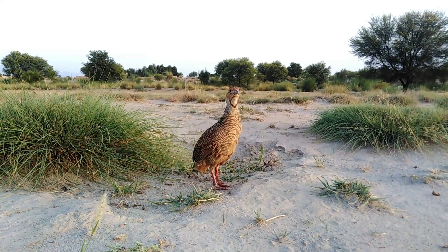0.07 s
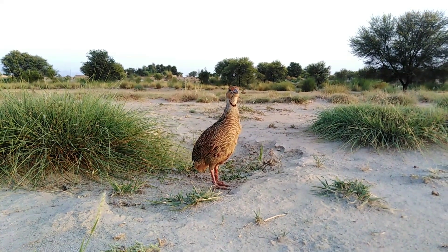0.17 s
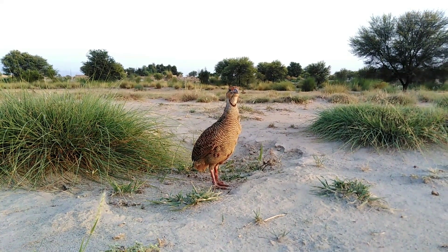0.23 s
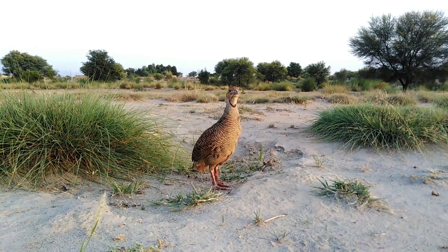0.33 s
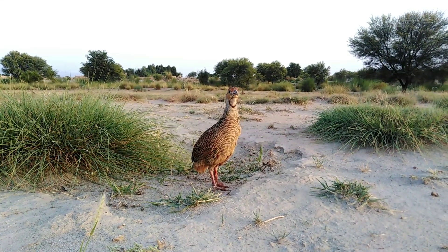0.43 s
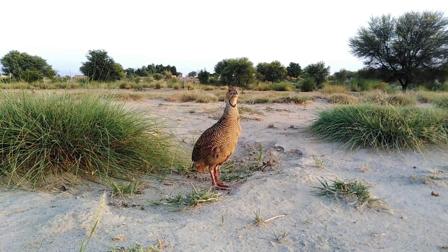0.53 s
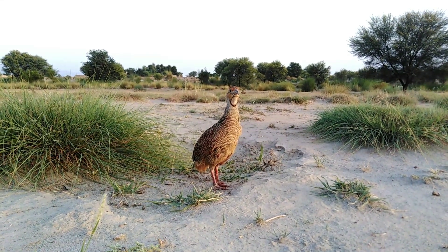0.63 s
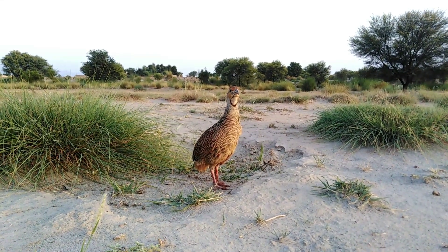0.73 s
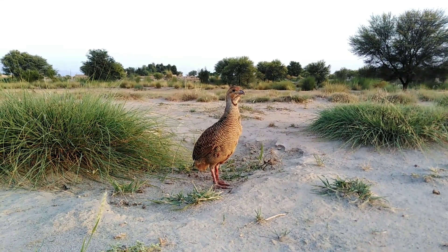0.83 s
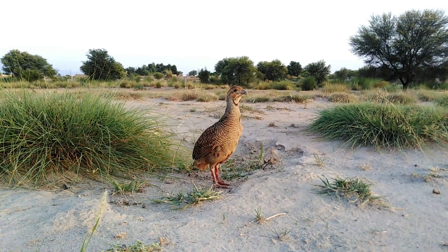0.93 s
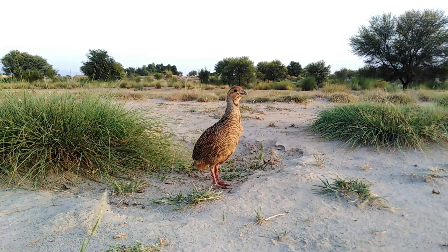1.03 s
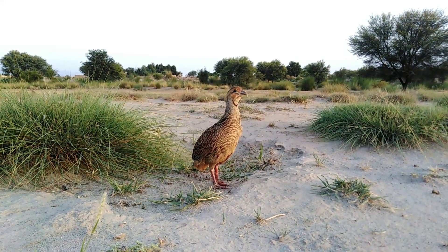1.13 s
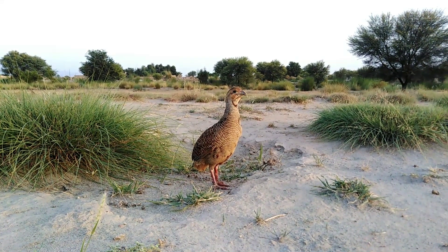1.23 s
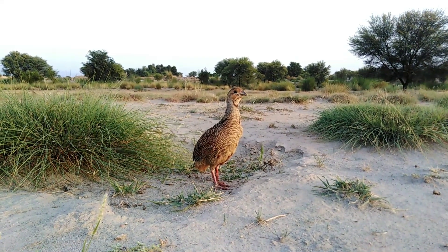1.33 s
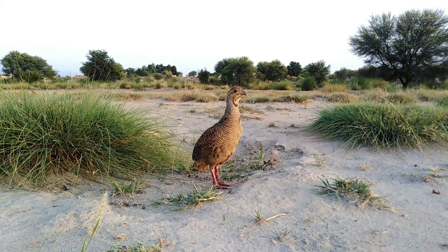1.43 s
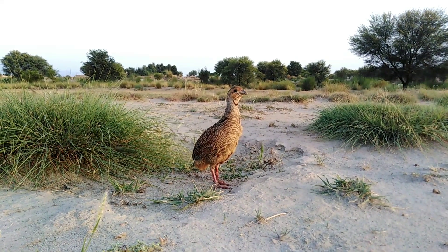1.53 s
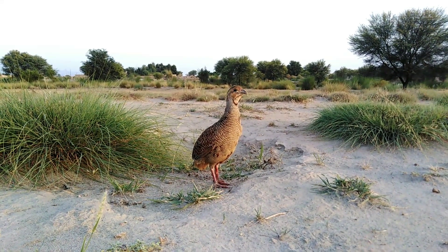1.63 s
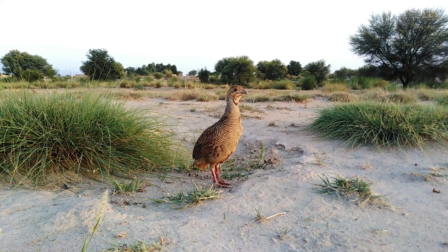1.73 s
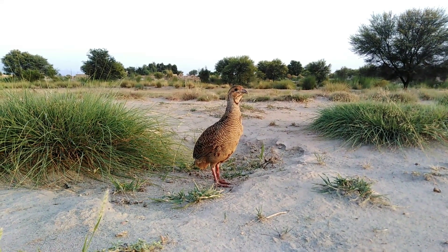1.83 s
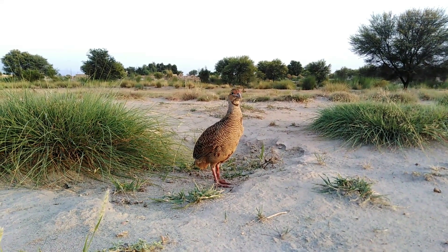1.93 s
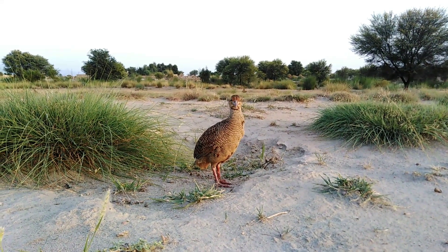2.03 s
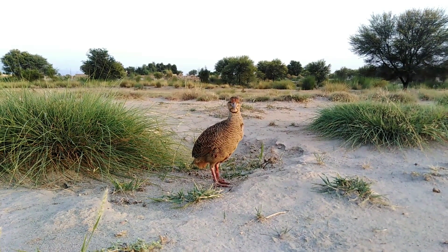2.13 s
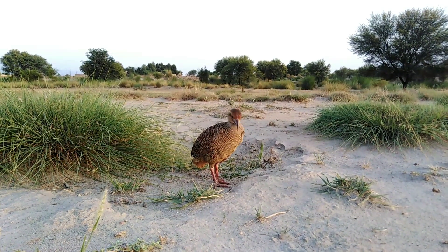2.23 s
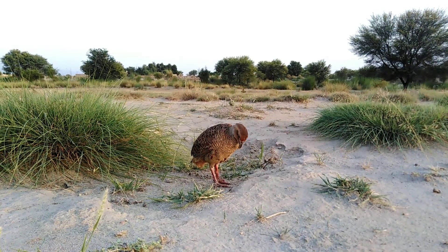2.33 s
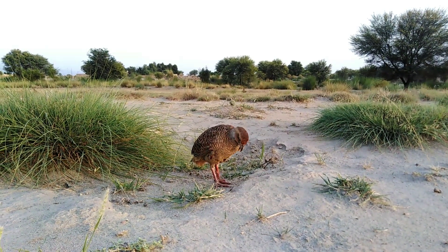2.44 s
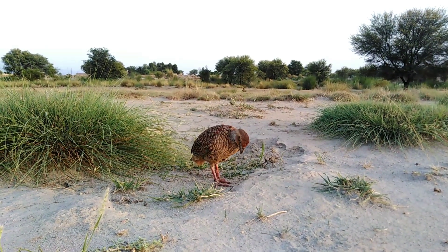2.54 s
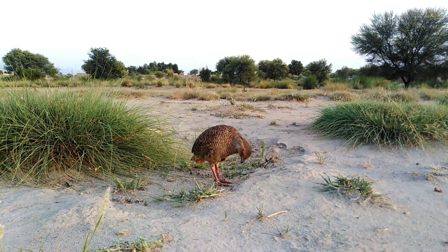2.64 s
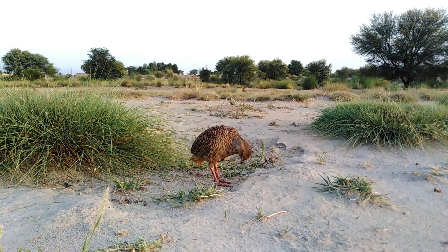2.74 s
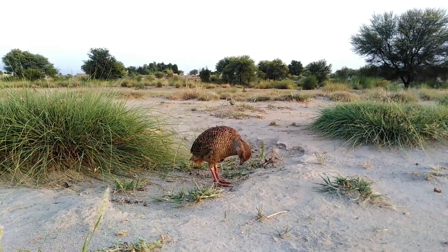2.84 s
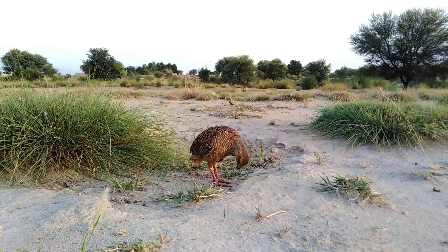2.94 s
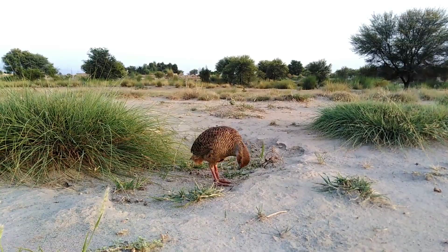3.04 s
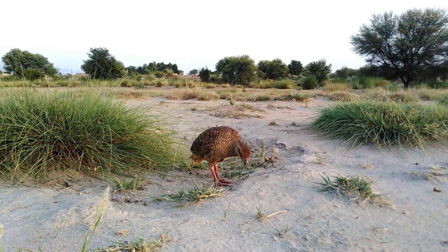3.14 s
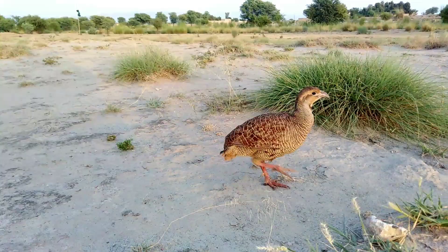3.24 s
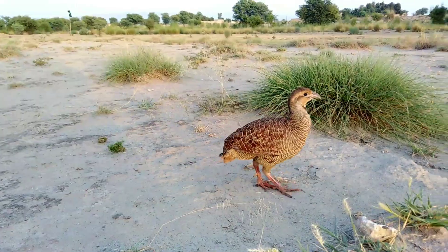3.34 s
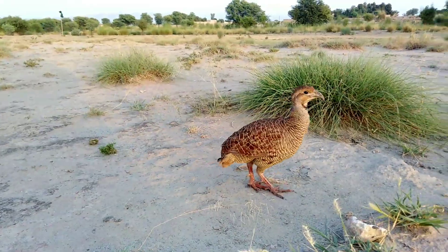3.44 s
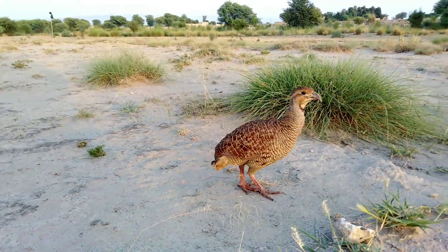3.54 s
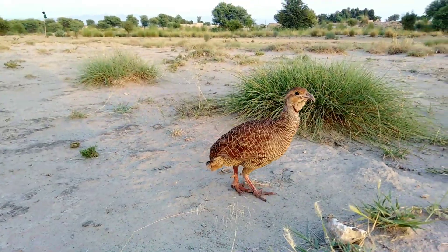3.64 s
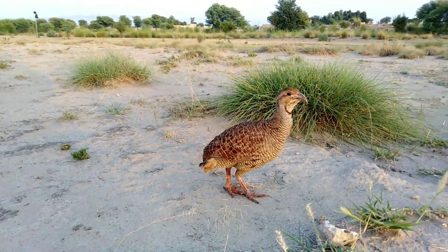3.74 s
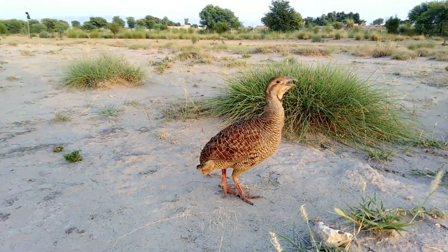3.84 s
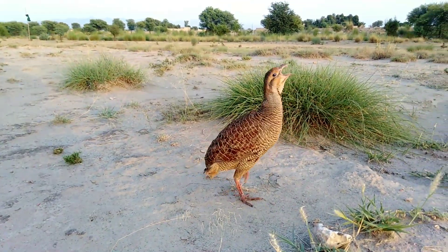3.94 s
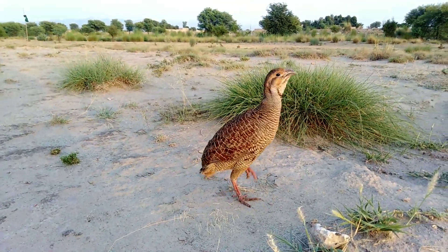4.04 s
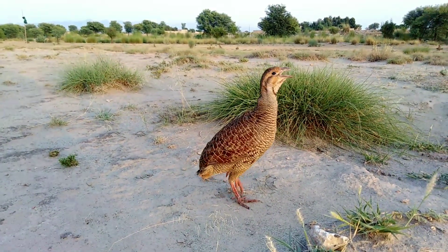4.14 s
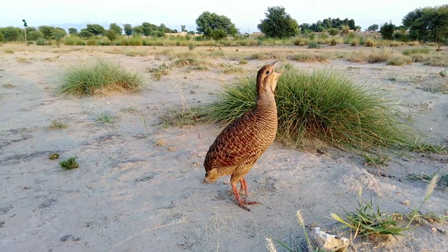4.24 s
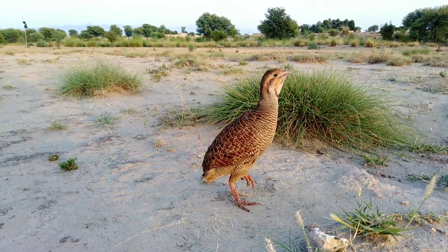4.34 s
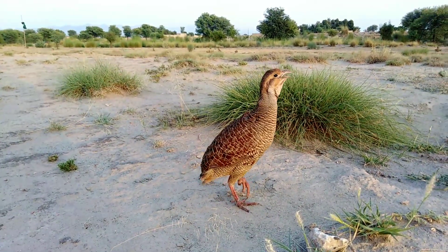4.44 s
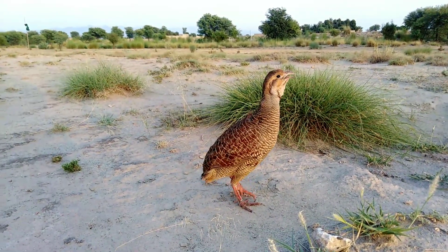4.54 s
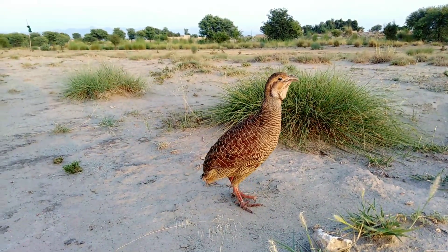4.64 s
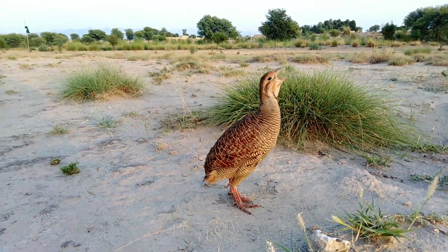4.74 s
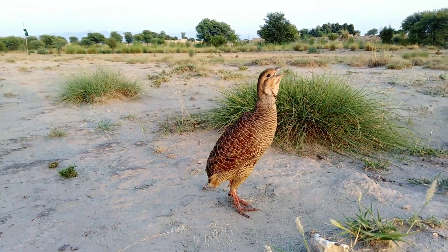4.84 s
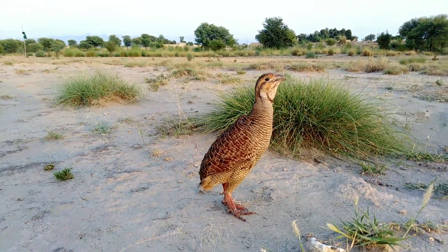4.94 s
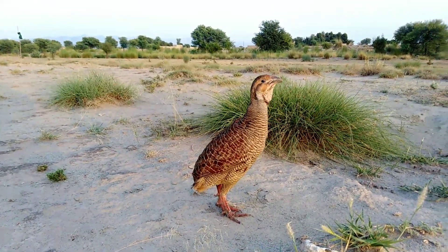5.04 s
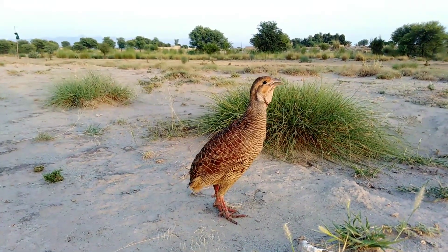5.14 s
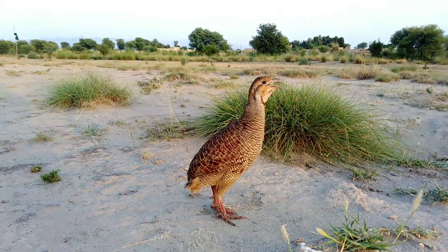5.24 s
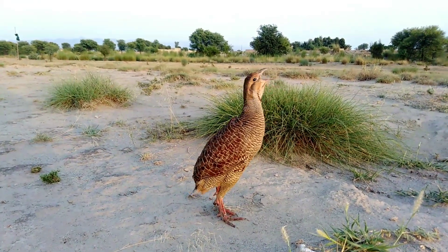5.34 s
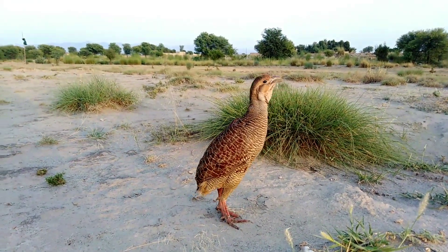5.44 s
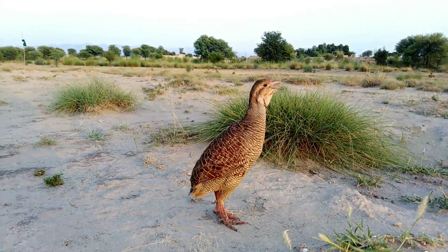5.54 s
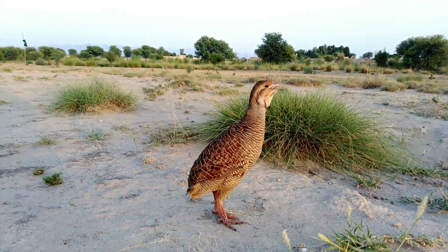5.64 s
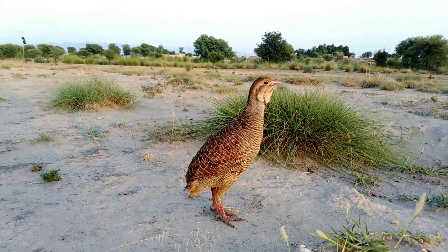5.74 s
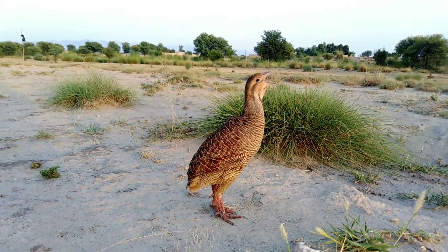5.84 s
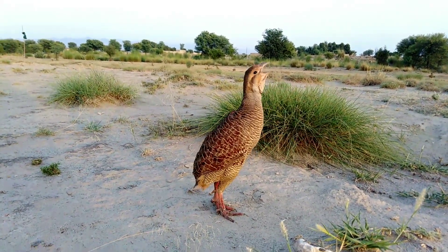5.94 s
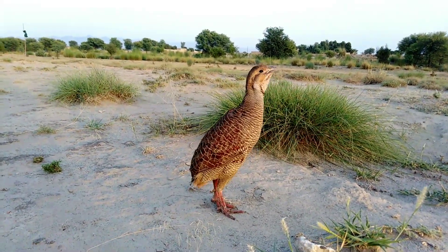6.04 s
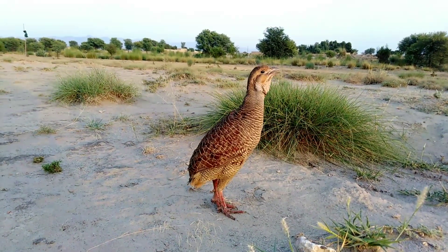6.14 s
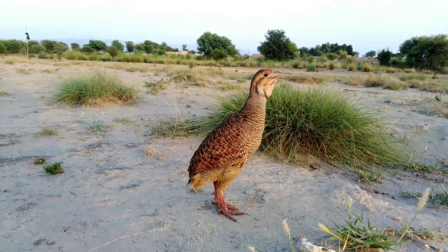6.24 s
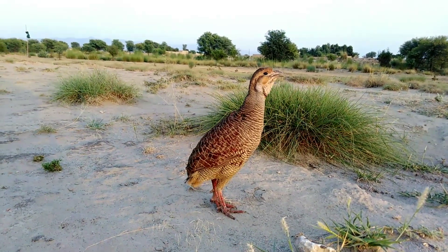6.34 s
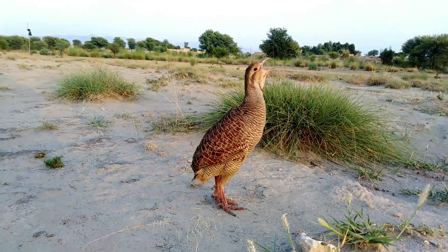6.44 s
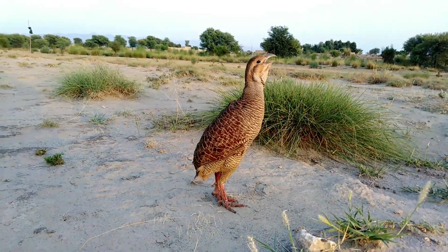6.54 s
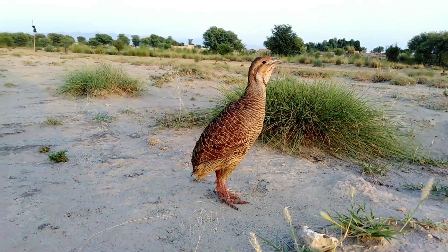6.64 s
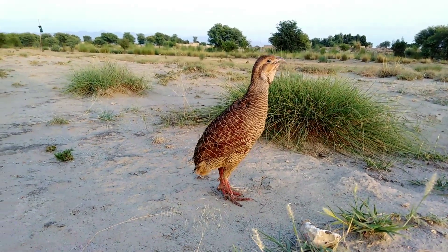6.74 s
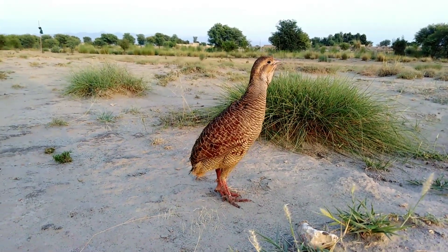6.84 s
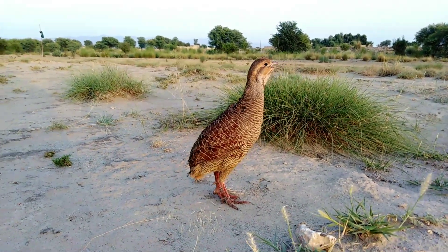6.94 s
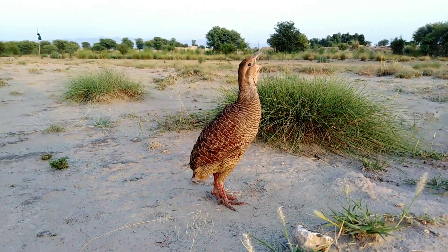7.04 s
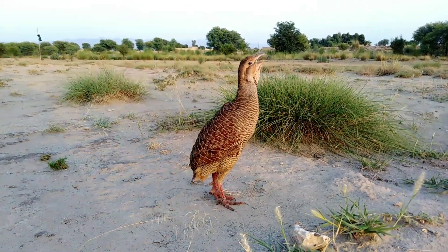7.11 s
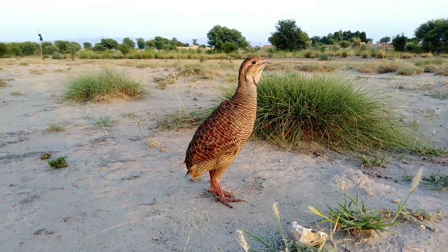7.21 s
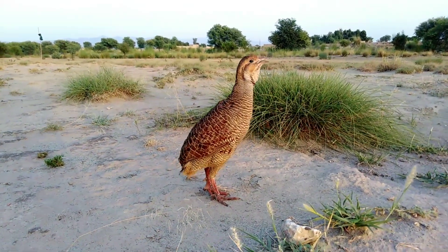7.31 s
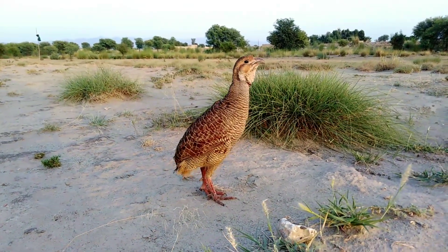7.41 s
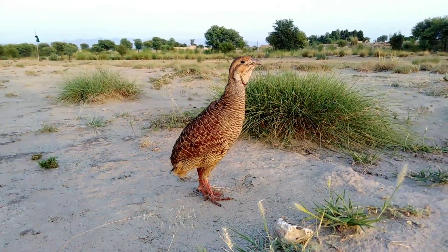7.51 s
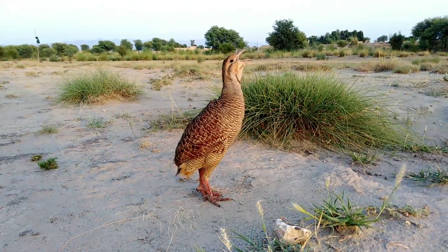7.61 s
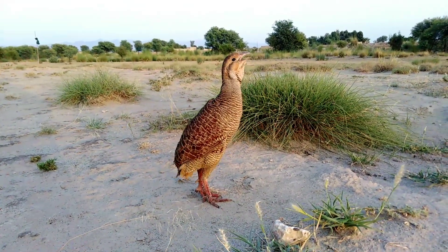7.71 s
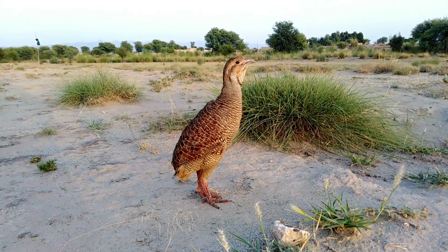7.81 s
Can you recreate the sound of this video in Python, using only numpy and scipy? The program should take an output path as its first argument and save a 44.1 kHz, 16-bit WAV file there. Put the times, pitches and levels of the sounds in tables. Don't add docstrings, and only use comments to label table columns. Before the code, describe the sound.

Low outdoor rumble, tiny birds and distant barking cut abruptly to a francolin's piercing squeal and repeated loud, raspy cluck-and-whistle calls, very close and distorted.

```python
import sys
import numpy as np
from scipy import signal
from scipy.fft import rfft, irfft, next_fast_len
from scipy.io import wavfile
from scipy.ndimage import uniform_filter1d

SR = 44100
rng = np.random.default_rng(int(sys.argv[2]) if len(sys.argv) > 2 else 0)


def makeup_ratio(level_db):
    decades = np.asarray(level_db, float) / 20
    return 10 ** decades


def unload_audio(sound):
    columns = np.transpose(np.atleast_2d(sound))
    steps = np.round(np.clip(columns, -1, 1) * 32767)
    wavfile.write(sys.argv[1], SR, steps.astype(np.int16))


N = 347054


def evened(x):
    return x / np.sqrt(np.mean(x ** 2) + 1e-20)


def even_loudness(x, size, floor=1e-9):
    power = uniform_filter1d((x ** 2).mean(0), size=size)
    return x / np.sqrt(abs(power) + floor)


def left_right(left, right):
    return np.array([[left], [right]])


def read(points, hz, axis=1):
    table = np.array(points)
    return np.interp(np.log(hz + 1), np.log(table[:, 0] + 1), table[:, axis])


def add(mix, s, sound):
    part = mix[..., round(s * SR):][..., :sound.shape[-1]]
    part += sound[..., :part.shape[-1]]


def colour(x, gain):
    size = next_fast_len(x.shape[-1])
    spectrum = rfft(x, size) * gain(np.fft.rfftfreq(size, 1 / SR))
    return irfft(spectrum, size)[..., :x.shape[-1]]


def wobble(hz, size):
    return evened(colour(rng.standard_normal(size), lambda f: np.exp(-(f / hz) ** 2)))


def phase(hz):
    return 2 * np.pi * np.cumsum(hz) / SR


def glide(start, end, a, b, bend=0.92):
    return a + (b - a) * np.linspace(0, 1, round((end - start) * SR)) ** bend


def call(s, hz, db, gain, rough, count):
    t = np.arange(s[0], s[-1], 1 / SR)
    pitch = np.interp(t, s, hz) * np.exp(rough * wobble(160, len(t)))
    turn = phase(pitch)
    sound = sum(gain(k, k * pitch) * np.cos(k * turn) for k in range(1, count + 1))
    return evened(sound) * makeup_ratio(np.interp(t, s, db)) * signal.windows.tukey(len(t), .08)


# frequency in Hz, level in dB per Hz.
AIR_COLOUR = [(20, -30.5), (60, -12), (135, 1.5), (200, -17.5), (300, -20), (450, -37.5), (1000, -43),
              (5000, -61), (14000, -64)]
# frequency in Hz, level in dB.
WHINE = [(1500, -90), (4500, -96.5), (6000, -90.5), (13500, -86.5)]


def air():
    shared, own = rng.standard_normal(N), rng.standard_normal((2, N))
    rumble = colour(shared, lambda f: makeup_ratio(read(AIR_COLOUR, f)) / (1 + (f / 260) ** 2))
    hiss = colour(own, lambda f: makeup_ratio(read(AIR_COLOUR, f)) * (1 - 0.13 / (1 + (f / 260) ** 2)))
    t = np.arange(N) / SR
    whine = sum(makeup_ratio(db + 2.7 * wobble(8, N)) * np.sin(2 * np.pi * hz * t) for hz, db in WHINE)
    return evened(rumble + hiss) * makeup_ratio(-53 + 0.55 * wobble(9, N)) + whine


# start in seconds, length in seconds, pitch at start in Hz, pitch at end in Hz, level in dB.
CHIRPS = [(0, 0.03, 5200, 4330, -59.5), (.04, 0.052, 4960, 6700, -65), (0.089, 0.036, 3750, 3400, -63),
          (0.162, .03, 3470, 3800, -76), (0.678, 0.033, 5040, 4200, -67.5),
          (1.245, 0.03, 4530, 4800, -71.5), (2.303, 0.0145, 9000, 7850, -60.5),
          (2.776, 0.074, 4245, 6440, -65), (2.834, .03, 4270, 4560, -65), (2.848, 0.048, 3700, 3280, -67),
          (3.02, 0.047, 6480, 6200, -80)]


def chirps():
    mix = np.zeros(N)
    for start, length, hz0, hz1, db in CHIRPS:
        add(mix, start, call([0, length], [hz0, hz1], [db, db], lambda k, f: 1, 0.0094, count=1))
    return mix


# start in seconds, level in dB, centre in Hz, time to die by 60 dB in seconds.
TICKS = [
    (0, -67, 2000, 0.52),
    (1.577, -51, 5050, 0.051),
    (2.332, -65, 1500, 0.15),
    (3.285, -52, 1580, 0.36),
    (3.296, -47.5, 9030, 0.017),
    (3.307, -62, 8840, .03),
    (3.362, -53, 6800, 0.023),
]


def ticks():
    mix = np.zeros(N)
    t = np.arange(9000) / SR
    for s, db, hz, t60 in TICKS:
        hiss = colour(rng.standard_normal(len(t)),
                      lambda f: np.exp(-np.log((f + 1) / hz) ** 2 / (0.25 + 1000 / hz)))
        add(mix, s, evened(hiss) * makeup_ratio(db - 60 * t / t60))
    return mix


# start in seconds, length in seconds, level in dB, top pitch in Hz, undertones in dB.
BARKS = [
    (0.954, 0.11, -45, 792, -3),
    (1.205, 0.133, -46.5, 776, -14),
    (2.626, 0.121, -55.5, 797, -11),
    (2.873, 0.125, -57.5, 778, -12),
    (3.454, 0.1, -67, 780, -18),
]
# frequency in Hz, level in dB.
BARK_COLOUR = [(450, -38), (750, -1.5), (1500, -0.5), (2300, -9), (3200, -27), (4500, -38), (6000, -57)]
# share of its length, level in dB, share of its top pitch.
BARK_ARCH = [(0, -25.5, .82), (.3, -4, .97), (.55, -1, 0.9), (1, -19.5, .88)]


def barks():
    mix = np.zeros(N)
    share, arch_db, arch = np.transpose(BARK_ARCH)
    for start, length, top_db, top_hz, under_db in BARKS:
        s = start + share * length
        dull_db_per_khz = 0.36 * (top_db - BARKS[0][2])

        def gain(k, f):
            undertone_db = under_db * (k % 3 > 0)
            return makeup_ratio(read(BARK_COLOUR, f) + undertone_db + dull_db_per_khz * f / 1000)

        add(mix, s[0], call(s, top_hz * arch / 3, top_db + arch_db, gain, 0.035, count=18))
    return mix


# time in seconds, pitch in Hz, level in dB.
WARBLES = [
    [(2.11, 1350, -55.5), (2.15, 1054, -55.5), (2.165, 1444, -45), (2.18, 1514, -52), (2.2, 1160, -53),
     (2.22, 1020, -50), (2.255, 872, -55), (2.277, 1450, -61), (2.29, 1000, -75)],
    [(2.305, 840, -76), (2.32, 758, -53.5), (2.345, 503, -47.5), (2.38, 404, -54)],
    [(3.283, 660, -39.5), (3.31, 606, -49.5), (3.332, 596, -49)],
    [(3.55, 1420, -68), (3.57, 1456, -44.5), (3.6, 1248, -52), (3.62, 712, -47), (3.66, 463, -40.5),
     (3.72, 383, -43.5), (3.78, 313, -44)],
]


def warbles():
    mix = np.zeros(N)
    for rows in WARBLES:
        s, hz, db = np.transpose(rows)
        add(mix, s[0], call(s, hz, db, lambda k, f: makeup_ratio(-11 * k - 2 * (f > 3000)), 0.0068, count=5))
    return mix


def scrub(x, t60):
    t = np.arange(SR // 2) / SR
    noise = colour(rng.standard_normal((2, len(t))), lambda f: f / (f + 300) / (1 + f / 4000))
    tail = noise * makeup_ratio(-60 * t / t60) * (t > .004)
    return signal.fftconvolve(x * np.ones((2, 1)), tail / np.linalg.norm(tail[0]), axes=1)[:, :N]


# time in seconds, pitch in Hz, tone in dB, breath in dB.
SQUEAL = [
    (3.62, 3300, -74, -60.5),
    (3.665, 3326, -36, -31.5),
    (3.721, 3445, -16, -30.5),
    (3.77, 3520, -16.5, -31.5),
    (3.871, 3450, -12, -31.5),
    (3.895, 3560, -13, -30.5),
    (3.913, 3620, -37.5, -37.5),
    (3.921, 3550, -20.5, -34),
    (3.935, 3604, -23.5, -23.5),
]
# frequency in Hz, level in dB per Hz.
BREATH = [(150, -21.5), (400, -4), (1700, 2), (3400, 7), (5500, -0.5), (7000, 0.5), (8000, -17.5),
          (13500, -20), (15000, -35)]


def squeal():
    s, *columns = np.transpose(SQUEAL)
    t = np.arange(s[0], s[-1], 1 / SR)
    hz, tone_db, breath_db = (np.interp(t, s, c) for c in columns)
    turn = phase(hz + 14 * wobble(40, len(t)))
    tone = np.sqrt(2) * (np.cos(turn) + makeup_ratio(-30.5) * np.cos(2 * turn))
    tone = tone * makeup_ratio(tone_db + 0.72 * wobble(60, len(t)))
    breath = evened(colour(rng.standard_normal((2, len(t))), lambda f: makeup_ratio(read(BREATH, f))))
    return tone * makeup_ratio(left_right(3.5, -6.5)) + breath * makeup_ratio(breath_db)


# frequency in Hz, left level in dB, right level in dB.
THROAT = [(553, -18, -17), (890, -10.5, -13), (1610, -3.5, 1), (2000, -5.5, 1.5), (2530, -7, -3),
          (2900, 0.5, -8.5), (4120, -11, -2), (4500, 1, 0.5), (5630, 7.5, 2.5), (6390, 2.5, 1.5),
          (8240, -6.5, -10.5), (9800, -13.5, -12), (12100, -11, -11), (15000, -25, -24.5)]


def throat(hz):
    return makeup_ratio(np.array([read(THROAT, hz, axis=1), read(THROAT, hz, axis=2)]))


def hiss_colour(hz):
    return throat(hz) / (1 + hz / 2500)


def breath_envelope(notes):
    out, t = np.zeros(N), np.arange(SR // 4) / SR
    for start, end in notes:
        attack = np.minimum(t / .007, 1) ** 1.6
        add(out, start, attack * makeup_ratio(-2400 * np.maximum(t - (end - start), 0)))
    return np.minimum(out, 1)


def rasp(notes, rasps, clean):
    start, *columns = np.transpose(sorted(rasps))
    row = np.maximum(np.searchsorted(start, np.arange(N) / SR) - 1, 0)
    hz, db, rough = (uniform_filter1d(c[row], size=130) for c in columns)
    rough = .22 + .78 * np.clip(rough, 0, 1)
    hz = hz * np.exp(.1 * rough * wobble(230, N))
    turn = phase(hz)
    lag = left_right(0, 1) * (.5 + 0.73 * wobble(28, N))
    gape_db = np.clip((hz - 2450) / 30, 0, 16)
    shut_db = np.clip((1750 - hz) / 20, 0, 9)
    tone = 0
    for k in range(1, 7):
        overtone_db = -6 * k + gape_db * (k == 1) - shut_db * (k in (2, 3))
        tone = tone + throat(k * hz) * makeup_ratio(overtone_db) * np.sin(k * (turn - lag)) * (k * hz < 15000)
    bursts = even_loudness(tone, 200) * (1 + .75 * rough * wobble(200, N))
    second = np.cos(phase(1360 * np.exp(0.089 * wobble(150, N)))) * (1 + .5 * wobble(270, N))
    noise = rng.standard_normal(N) + 1.04 * rng.standard_normal((2, N))
    hiss = evened(colour(noise, hiss_colour))
    voice = bursts + rough ** 3 * second * left_right(.5, 1.4) + .6 * rough * hiss
    shrill = colour(np.sign(voice), lambda f: f > 7500)
    voice = voice + 0.48 * np.clip((hz - 1600) / 500, 0, 1) * shrill
    voice = even_loudness(voice, 400)
    locked = np.zeros(N)
    for row in clean:
        add(locked, row[0] + .0015, np.ones(round((row[1] - row[0] - .003) * SR)))
    rests = uniform_filter1d(1 - np.minimum(locked, 1), size=110)
    return voice * makeup_ratio(db) * breath_envelope(notes) * rests


def slur(start, end, hz0, hz1, db, bend=1.2, fade_db=0):
    hz = glide(start, end, hz0, hz1, bend)
    k = np.arange(1, 7)[:, None]
    shut_db = np.clip((1750 - hz) / 30, 0, 9) * ((k == 2) | (k == 3))
    gains = throat(k * hz) * makeup_ratio(-4.5 * k - 5 * (k > 3) + 6 * (k * hz > 11000) - shut_db)
    turn = k * (phase(hz) - np.array([0, .45])[:, None, None])
    tone = (gains * np.sin(turn)).sum(1) / np.sqrt((gains ** 2).sum(1).mean(0) / 2)
    hiss = colour(rng.standard_normal(tone.shape), hiss_colour)
    bright = colour(hiss, lambda f: f > 8500)
    sound = tone + makeup_ratio(-20.0) * evened(hiss) + makeup_ratio(-28) * evened(bright)
    level = makeup_ratio(glide(start, end, db, db + fade_db, bend))
    return level * sound * signal.windows.tukey(len(hz), min(110 / len(hz), 1))


# left level in dB, right level in dB.
WHISTLE_TONES = [(0, -2), (-24, -10), (-11, -17), (-22, -15), (-17, -26), (-23, -21)]


def whistle(start, end, hz0, hz1, db, lead):
    hz = np.r_[glide(start, end, hz0, hz1), glide(0, .007, hz1, .62 * hz1, bend=1.6)]
    k = np.arange(1, 7)[:, None]
    turn = k * (phase(hz) - np.array([0, lead])[:, None, None])
    tone = (makeup_ratio(np.transpose(WHISTLE_TONES))[:, :, None] * np.cos(turn)).sum(1)
    hiss = colour(rng.standard_normal(tone.shape), hiss_colour)
    push = left_right(.04, .07) * (1 + 0.18 * wobble(60, len(hz)))
    fold_hz = np.geomspace(150, 850, len(hz))
    push[0] += 0.015 * np.sin(phase(fold_hz))
    swell_db = 3 * (np.linspace(-.6, 1, len(hz)) ** 2 - 0.72)
    sound = evened(tone) + makeup_ratio(-22.0) * evened(hiss) + push
    return makeup_ratio(db + swell_db) * sound * signal.windows.tukey(len(hz), .06)


def gulp():
    t = np.arange(1100) / SR
    return left_right(.02, .09) * np.sin(2 * np.pi * 960 * t) * np.hanning(len(t))


def placed(shape, at, start=0, effort_db=0):
    return [(max(at + s, start + 1e-5 * k), hz, db + effort_db, rough)
            for k, (s, hz, db, rough) in enumerate(shape)]


# start in seconds, end in seconds.
LOW_NOTE = (3.932, 4.07)
# start in seconds, end in seconds, pitch in Hz, pitch at end in Hz, level in dB.
LOW_CLEAN = [
    (3.974, 4.0, 1855, 1858, -5.8),
    (4.024, 4.07, 1885, 1330, -5.9),
]
# seconds after the start, centre pitch in Hz, level in dB, roughness from 0 to 1.
LOW_RASP = [
    (0, 2530, -12, .85),
    (.026, 2628, -11.5, .85),
    (.067, 2611, -6.5, .47),
    (.077, 1778, -12.5, .47),
]


def low_note():
    return [LOW_NOTE], placed(LOW_RASP, LOW_NOTE[0]), list(LOW_CLEAN)


# start in seconds, whistle start in seconds, whistle pitch in Hz, left side's lead in
# radians per overtone, rasp pitch in Hz just before the whistle.
MIDDLES = [(4.077, 4.118, 2261, 2.7, 2325), (4.58, 4.654, 2298, 2.6, 3130), (5.127, 5.177, 2306, 3.4, 3190),
           (5.692, 5.735, 2305, 3.4, 3200), (6.263, 6.312, 2307, 3.0, 3186),
           (6.842, 6.885, 2303, 1.7, 2412), (7.43, 7.472, 2307, .8, 2433)]
# seconds from its start, centre pitch in Hz, level in dB, roughness from 0 to 1.
WIND_UP = [(-.075, 1403, -9, .15), (-.044, 2900, -9.5, .85), (-.031, 3090, -5, .6)]
# seconds from its end, centre pitch in Hz, level in dB, roughness from 0 to 1.
SNAP = [(-.001, 3806, -2, .3), (.005, 2819, -5, .55), (.013, 2860, -12.5, .55), (.019, 2900, -13.5, .55)]


def middle_notes():
    whistle_s, close_s, rise_hz, whistle_db = .0805, .022, 42, -4.5
    notes, rasps, whistles = [], [], []
    for start, on, hz, lead, push_hz in MIDDLES:
        off = on + whistle_s
        notes.append((start, off + close_s))
        last_push = (on - .016, push_hz, -3, .68)
        rasps += placed(WIND_UP, on, start) + [last_push] + placed(SNAP, off)
        whistles.append((on, off, hz - rise_hz / 2, hz + rise_hz / 2, whistle_db, lead))
    return notes, rasps, whistles


# start, start of the hold, start of the fall and end of the fall in seconds, pitch in Hz.
LONGS = [(4.244, 4.292, 4.336, 4.362, 2410), (4.771, 4.808, 4.856, 4.895, 2455),
         (5.318, 5.365, 5.412, 5.458, 2472), (5.887, 5.936, 5.983, 6.026, 2470),
         (6.457, 6.504, 6.554, 6.602, 2466), (7.051, 7.096, 7.149, 7.188, 2443),
         (7.631, 7.677, 7.73, 7.767, 2440)]
# seconds from it, centre pitch in Hz, level in dB, roughness from 0 to 1.
OPENING = [(-.05, 1679, -8.5, .5), (-.031, 2602, -9, .5), (-.015, 2530, -11.5, .55)]
# seconds from its end, centre pitch in Hz, level in dB, roughness from 0 to 1.
BREAK = [(-.001, 1883, -9.5, .5), (.013, 2691, -11, .5)]
# seconds from its end, centre pitch in Hz, level in dB, roughness from 0 to 1.
ENDING = [(0, 1700, -9, .6), (.011, 1420, -12, .5), (.016, 1350, -20, .5)]


def long_notes():
    break_s, drop_s, fade_s = .029, .007, .019
    hold_db, fall_db, peep_db = -6.5, -8, -8.5
    notes, rasps, slurs = [], [], []
    for start, hold, fall, end, hz in LONGS:
        hold_end = fall - break_s
        notes.append((start, end + fade_s))
        rasps += placed(OPENING, hold, start) + placed(BREAK, hold_end) + placed(ENDING, end)
        slurs.append((hold, hold_end, hz, hz * .993, hold_db))
        slurs.append((fall, end + drop_s, hz, hz * .805, fall_db, 1.6, -4))
        peep = hold - .038
        if peep > start:
            slurs.append((peep, hold - .028, 1730, 1775, peep_db))
    return notes, rasps, slurs


# start in seconds, seconds locked on the low pitch before the flip, pitch at end in Hz,
# effort in dB.
CLUCKS = [(4.470, 0, 1520, -1), (5.011, .013, 1470, 0.5), (5.575, 0, 1535, 0), (6.147, 0, 1686, -1),
          (6.72, 0, 1544, 0.5), (7.312, .017, 1610, -1)]
# seconds after the start, centre pitch in Hz, level in dB, roughness from 0 to 1.
CLUCK_RASP = [
    (0, 1426, -9, .5),
    (.017, 1475, -8, .33),
    (.05, 1396, -32, .5),
]


def clucks():
    flip_s, length_s = .036, .060
    low_hz, high_hz, low_db, high_db = 1480, 2020, -9, -13.5
    notes, rasps, slurs = [], [], []
    for start, lock, end_hz, db in CLUCKS:
        flip, end = start + flip_s, start + length_s
        notes.append((start, end))
        rasps += placed(CLUCK_RASP, start, start, db)
        slurs.append((flip, end, high_hz, end_hz, high_db + db, 3.6, -4.5))
        if lock > 0:
            slurs.append((flip - lock, flip, low_hz, low_hz * .993, low_db + db))
    return notes, rasps, slurs


def francolin():
    low_air, low_rasps, low_slurs = low_note()
    middle_air, middle_rasps, whistles = middle_notes()
    long_air, long_rasps, long_slurs = long_notes()
    cluck_air, cluck_rasps, cluck_slurs = clucks()
    notes = low_air + middle_air + long_air + cluck_air
    rasps = low_rasps + middle_rasps + long_rasps + cluck_rasps
    slurs = low_slurs + long_slurs + cluck_slurs
    bird = rasp(notes, rasps, slurs + whistles)
    for row in slurs:
        add(bird, row[0], slur(*row))
    for row in whistles:
        add(bird, row[0], whistle(*row))
        add(bird, row[1] + 0.013, gulp())
    bird = colour(bird, lambda f: 1 - .65 * np.exp(-((f - 3880) / 260) ** 2))
    add(bird, SQUEAL[0][0], squeal())
    return bird * makeup_ratio(left_right(.9, -.3))


def scene():
    others = chirps() + ticks() + barks() + warbles()
    far = others + makeup_ratio(-9.5) * scrub(others, 0.29)
    bird = francolin()
    near = bird + makeup_ratio(-47.0) * scrub(bird, 0.57)
    return near + far + air() * makeup_ratio(left_right(.5, -.5))


# time in seconds, level in dB.
CUT = [
    (0, 2),
    (3.17, 4),
    (3.25, -17),
    (3.275, -70),
    (3.284, -70),
    (3.2855, 2.5),
    (7.87, 2),
]


def edit(x):
    s, db = np.transpose(CUT)
    return x * makeup_ratio(np.interp(np.arange(N) / SR, s, db))


def overload(x):
    thump = colour(x ** 2, lambda f: (f / (f + 90)) ** 2 / (1 + (f / 450) ** 4))
    x = x + left_right(.22, .1) * thump
    level = np.sqrt(2 * abs(uniform_filter1d(x ** 2, size=120, axis=1)))
    x = x / np.maximum(level / .93, 1)
    return x / (1 + abs(x / .97) ** 6) ** (1 / 6)


def top_cut(x):
    return signal.sosfilt(signal.butter(12, 15160, fs=SR, output="sos"), x)


def record(dry):
    loud = overload(edit(dry))
    mix = colour(loud, lambda f: 1 / (1 + (f / 14350) ** 60))
    return top_cut(mix)


dry = scene()
out = record(dry)
unload_audio(out)
```